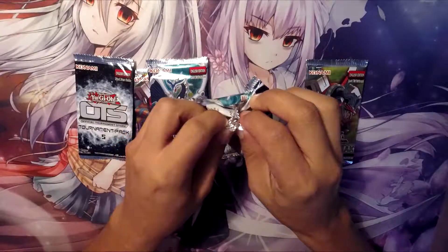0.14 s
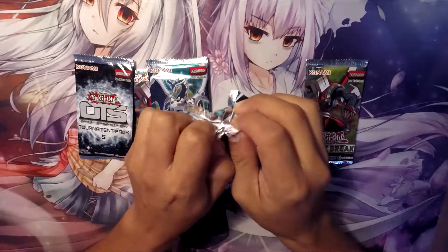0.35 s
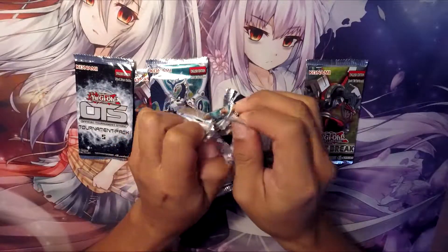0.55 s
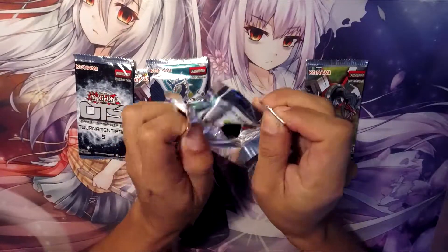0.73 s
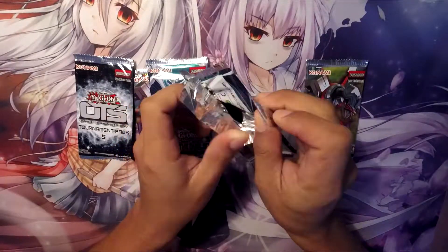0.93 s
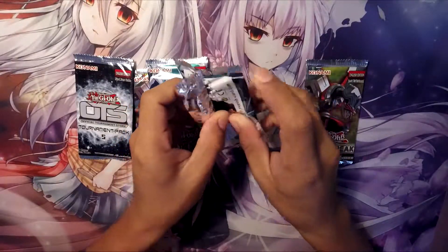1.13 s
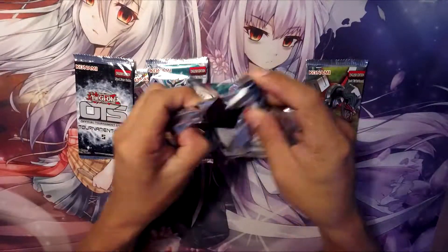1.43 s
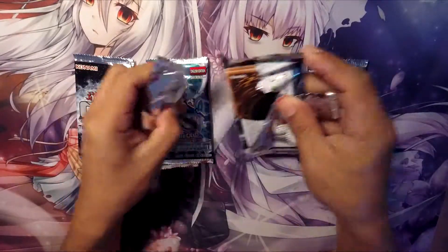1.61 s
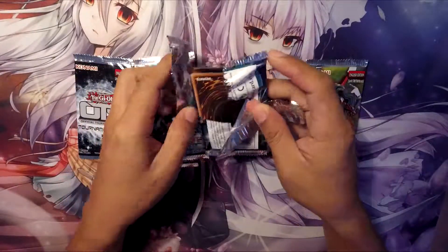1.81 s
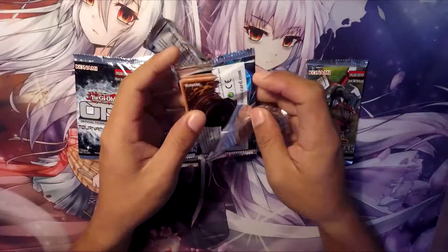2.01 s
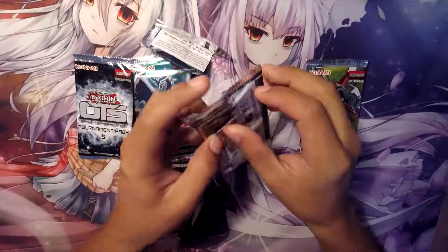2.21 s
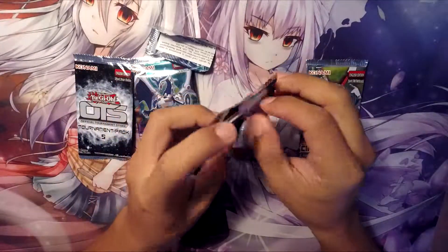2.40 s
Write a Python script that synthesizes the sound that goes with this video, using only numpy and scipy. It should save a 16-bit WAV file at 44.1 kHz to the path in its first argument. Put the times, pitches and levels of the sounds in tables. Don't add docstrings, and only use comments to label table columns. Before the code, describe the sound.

A thin foil packet is crinkled, pulled and ripped open by hand, close up

```python
import sys
import numpy as np
from scipy import signal
from scipy.fft import rfft, irfft
from scipy.io import wavfile
from scipy.ndimage import map_coordinates

SR = 44100
rng = np.random.default_rng(int(sys.argv[2]) if len(sys.argv) > 2 else 0)


def inscribe(sig):
    pcm = np.round(np.clip(np.atleast_2d(sig).T, -1, 1) * 32767)
    wavfile.write(sys.argv[1], SR, pcm.astype(np.int16))


def volts(x):
    e = np.asarray(x, float) / 20
    return 10 ** e


N = 112454


def unit(x):
    return x / np.sqrt(np.mean(x ** 2) + 1e-20)


def along(points, hz):
    f, v = np.transpose(points)
    return np.interp(np.log(hz + 1), np.log(f + 1), v)


def coloured(x, points, size=8192):
    level_db = along(points, np.fft.rfftfreq(size, 1 / SR)).clip(-120)
    cepstrum = irfft(level_db * np.log(10) / 20, size)
    cepstrum[1:size // 2] *= 2
    cepstrum[size // 2 + 1:] = 0
    ring = irfft(np.exp(rfft(cepstrum)), size)[:min(size // 2, x.shape[-1])]
    ring = ring.reshape([1] * (x.ndim - 1) + [-1])
    return signal.fftconvolve(x, ring, axes=-1)[..., :x.shape[-1]]


def noise():
    return rng.standard_normal(N)


def wobble(knots_per_s):
    return map_coordinates(rng.standard_normal(1000), [np.arange(N) * knots_per_s / SR])


def placed(start_s, shapes):
    first = np.round(start_s * SR).astype(int).clip(0)
    at = first[:, None] + np.arange(shapes.shape[1])
    return np.bincount(at.ravel(), shapes.ravel(), N + SR)[:N]


def rings(hz, cycles, size):
    turns = np.arange(size) / SR * hz.clip(600, SR / 2.4)[:, None]
    return np.sin(2 * np.pi * turns) * volts(-turns * 60 / cycles) * (1 - np.exp(-1.5 * turns))


# start in seconds, hold in seconds, rustle in dB, rumble in dB.
STROKES = [(0, 0.0056, -40.5, -47), (0.135, 0.11, -51, -55), (0.218, 0.15, -45.5, -58.5),
           (0.39, 0.07, -46, -62), (0.493, 0.059, -36.5, -57), (0.561, 0.057, -30.5, -40.5),
           (0.654, 0.054, -45.5, -73), (0.728, 0.025, -34, -54.5), (0.83, 0.037, -40, -49.5),
           (0.896, 0.026, -54, -43.5), (0.969, 0.11, -39, -52), (1.022, 0.03, -31.5, -46.5),
           (1.085, 0.16, -47.5, -59), (1.394, 0.019, -21.5, -36), (1.427, 0.041, -31, -41),
           (1.481, 0.22, -48.5, -57.5), (1.905, 0.023, -66, -53), (1.972, 0.098, -48, -54),
           (2.215, 0.061, -48, -62), (2.446, 0.063, -59, -82)]


def strokes(column, attack_s, t60_s):
    rows = np.array(STROKES)
    since_s = np.arange(N) / SR - rows[:, :1]
    rise = np.clip(since_s / attack_s + 0.5, 0, 1)
    release_s = np.clip(since_s - rows[:, 1:2], 0, None)
    level = volts(rows[:, column, None]) * rise * volts(-60 * release_s / t60_s)
    return np.sqrt((level ** 2).sum(axis=0))


# frequency in Hz, level in dB per Hz.
FOIL = [(180, -39.5), (300, -7.5), (2060, -13.5), (3570, -9), (5520, -7.5), (7970, -10.5), (10600, -8),
        (13600, -32.5), (16400, -38)]


def rustle(count=4500, size=300):
    when, luck = rng.random((count, 2)).T
    hz = 3530 * np.exp(0.63 * rng.standard_normal(count))
    clumps_db = 3 * wobble(40.16) + 3 * wobble(150)
    size_db = -3.5 * np.log(1 - luck) + clumps_db[(when * N).astype(int)]
    size_gain = volts(np.minimum(size_db, 12))[:, None]
    start_s = when * N / SR
    ticks = placed(start_s, size_gain * rings(hz, 9.4, size))
    clicks = placed(start_s, size_gain * rng.standard_normal((count, 24)))
    sheen = volts(-16 + clumps_db) * noise()
    swarm = unit(ticks) + 0.32 * unit(clicks) + sheen
    force = strokes(2, attack_s=0.0021, t60_s=0.053)
    idle = volts(-55.5 - 3)
    return np.hypot(force, idle) * unit(coloured(swarm, FOIL))


# frequency in Hz, level in dB per Hz.
TABLE = [(150, 3), (220, 6), (330, -13), (1500, -29.5)]


def rumble():
    lumps = volts(0.88 * wobble(27.5))
    return strokes(3, attack_s=0.016, t60_s=0.15) * unit(lumps * coloured(noise(), TABLE))


# frequency in Hz, level in dB per Hz.
HUSH = [(30, 8), (160, 0), (300, -4.5), (3500, -19.5), (6000, -14.5), (15000, -32)]


def hush():
    return volts(-54.5 + 3.5 * wobble(8.8)) * unit(coloured(noise(), HUSH))


# start in seconds, crack in dB, pop in dB, pop pitch in Hz.
PINCHING = [
    (0.0082, -21.5, -24.5, 900),
    (0.0605, -34.5, -25.5, 2430),
    (0.1358, -29.5, -32, 2920),
    (0.1638, -27, -19.5, 1090),
    (0.2268, -8, -20, 1990),
    (0.2318, -10, -12.5, 2020),
    (0.3087, -18.5, -20, 2200),
    (0.4014, -17, -24.5, 2360),
    (0.4593, -15.5, -12.5, 1910),
]
PULLING = [(0.505, -14, -20, 3060), (0.5101, -13, -17, 1980), (0.5192, -12, -16, 2860),
           (0.5338, -16, -19, 1250), (0.5477, -15, -14, 2170), (0.5565, -12, -14, 1490),
           (0.5634, -10, -10, 2280), (0.5733, -14, -20, 3340), (0.5925, -16, -15, 2860),
           (0.6027, -23, -14, 2090), (0.6085, -11, -15, 1460), (0.614, -17, -14, 1010),
           (0.6247, -18, -17, 1980), (0.6321, -21, -18, 900), (0.717, -24, -29, 3100),
           (0.7344, -15, -21, 2260), (0.7522, -19, -25, 1510), (0.7717, -17, -20, 2890),
           (0.8373, -30, -26, 2170), (0.8557, -25, -27, 1080)]
GRIPPING = [(0.9044, -30, -33, 3300), (0.9293, -20.5, -21, 1090), (0.9566, -19.5, -23, 3040),
            (0.98, -28, -28, 1690), (0.9871, -19.5, -32, 1220), (1.0058, -19.5, -24.5, 1620),
            (1.0243, -16, -34, 2160), (1.0336, -16, -27, 2840), (1.1631, -50, -26, 2030),
            (1.1746, -14, -15.5, 2900), (1.196, -20, -17, 3170), (1.2267, -31, -22.5, 3000),
            (1.2606, -39, -20.5, 1310), (1.2787, -20, -17, 2160), (1.288, -17.5, -17, 1470),
            (1.313, -19, -15.5, 915), (1.3442, -31, -27, 1530)]
RIPPING = [
    (1.3876, -15.5, -16, 3130),
    (1.3963, -13, -12.5, 2800),
    (1.4024, -8.5, -9.5, 1530),
    (1.413, -5, -13, 3080),
    (1.4221, -12, -11, 2020),
    (1.4398, -13, -4.5, 2090),
    (1.6296, -20.5, -22.5, 2780),
    (1.6556, -19, -24, 800),
]
TURNING = [
    (1.8075, -28, -27.5, 2840),
    (1.916, -17, -25, 1440),
    (1.9775, -29.5, -30, 3440),
    (1.999, -22.5, -31.5, 1410),
    (2.2571, -25.5, -29.5, 880),
    (2.2695, -26.5, -26, 2800),
    (2.4586, -26.5, -30, 2740),
]
# start in seconds,
# crack in dB, pop in dB, pop pitch in Hz.
FURTHER_SNAPS = [(0.1645, -15.5, -28, 1520), (0.2239, -20, -18, 1970), (0.2967, -20, -29, 2510),
                 (0.3165, -21, -24, 2030), (0.556, -7, -11, 1120), (0.597, -22, -11.5, 1870),
                 (0.6398, -22, -32, 1010), (0.736, -19, -25, 1450), (0.784, -30, -29, 1990),
                 (0.8335, -30, -25, 1000), (0.8452, -33, -20, 2640), (0.867, -51, -41, 2500),
                 (0.882, -39, -33.5, 1190), (1.383, -35, -34, 1500), (1.409, -14, -14, 2430),
                 (1.447, -21, -22, 1980), (1.452, -16, -30, 2480), (1.454, -22, -25, 1780),
                 (1.925, -54, -37, 1370), (1.9395, -51, -32.5, 800), (1.976, -44, -39, 700),
                 (1.993, -35, -30.5, 990), (2.0045, -30, -41, 1500), (2.0545, -30, -31, 3000),
                 (2.228, -33, -34, 990), (2.2415, -35, -45, 1500), (2.2472, -35, -46, 2000),
                 (2.28, -33, -48, 1520), (2.285, -34, -35, 810), (2.479, -51, -33, 670)]
# start in seconds, crack in dB.
THIN = [(0.0046, -24.5), (0.174, -28.5), (0.208, -22), (0.266, -24), (0.2722, -23.5), (0.3322, -7.5),
        (0.3718, -27), (0.3782, -25.5), (0.4232, -25), (0.4495, -33), (0.4543, -19), (0.492, -36),
        (0.5021, -12), (0.583, -23), (0.7245, -39), (0.8114, -21), (0.8486, -22.5),
        (0.9504, -25), (0.997, -23), (0.9995, -15), (1.045, -13.5), (1.0487, -10.5), (1.0558, -23),
               (1.0564, -15.5), (1.084, -23.5), (1.1006, -26), (1.1195, -13), (1.123, -9), (1.1405, -34),
               (1.1457, -34), (1.1754, -39), (1.209, -31), (1.2184, -9), (1.2496, -15), (1.2553, -11),
               (1.331, -22), (1.465, -18.5),
        (1.527, -30), (1.5588, -28), (1.5698, -31), (1.6042, -20), (1.675, -27), (1.6946, -20),
             (1.726, -33), (1.7438, -31.5), (1.8356, -27.5), (1.8637, -31), (1.8809, -28), (2.0147, -27),
             (2.0214, -21), (2.039, -21), (2.0514, -20), (2.0886, -26.5), (2.1752, -35), (2.3846, -30),
             (2.3945, -27), (2.4756, -23), (2.5209, -15), (2.542, -23.5)]


def creases():
    thin = np.array(THIN)
    thin = [(s, db, db - 9.0, 2400) for s, db in thin]
    return np.concatenate([PINCHING, PULLING, GRIPPING, RIPPING, TURNING, FURTHER_SNAPS, thin]).T


def with_ticks(s, crack_db, pop_db, hz, count=5):
    shape = (len(s), count)
    late_s = rng.standard_exponential(shape) * 0.006 + 0.001224
    late_s[:, 0] *= -0.32
    weak_db = (-21.5 + 8 * rng.standard_normal(shape)).clip(None, -12)
    bend = np.exp(0.32 * rng.standard_normal(shape))
    s = np.append(s, s[:, None] + late_s)
    crack_db = np.append(crack_db, crack_db[:, None] + weak_db)
    pop_db = np.append(pop_db, pop_db[:, None] + weak_db)
    return s, crack_db, pop_db, np.append(hz, hz[:, None] * bend).clip(650)


# frequency in Hz, level in dB.
BRIGHT = [(2400, -20.5), (5500, 2.5), (7500, -13), (11000, -20.5), (16000, -85)]


def cracks(white, luck, rise, fall):
    burst = unit(coloured(white, BRIGHT)) * fall
    hz = 5300 * np.exp(0.18 * np.tanh(luck))
    return burst + 0.22 * rise * rings(hz, 14, white.shape[1])


def pops(white, hz, fall, rise_s):
    dull = unit(coloured(white, [(400, -42), (800, -4), (2500, 4.5), (4500, -25.5)]))
    cycles = np.minimum(0.007 * hz[:, None], 9)
    ring = np.roll(rings(hz, cycles, white.shape[1]), round(rise_s * SR), axis=1)
    return ring + volts(-1) * dull * fall


def peaked(x):
    return x / np.abs(x).max(axis=1, keepdims=True)


def snaps(size=700):
    s, crack_db, pop_db, hz = with_ticks(*creases())
    rise_s, t = 0.0006, np.arange(size) / SR
    white = rng.standard_normal((2, len(s), size))
    luck = rng.standard_normal((len(s), 2))
    t60_s = 0.0065 * np.exp(0.3 * luck[:, :1])
    rise = 1 - np.exp(-t / rise_s)
    fall = rise ** 2 * volts(-60 * t / t60_s)
    crack = volts(crack_db)[:, None] * peaked(cracks(white[0], luck[:, 1], rise, fall))
    pop = volts(pop_db)[:, None] * peaked(pops(white[1], hz, fall, rise_s))
    return placed(s - rise_s, crack + pop)


# start in seconds, level in dB, pitch in Hz.
SPARKS = [(0.056, -36, 10200), (0.2058, -13.5, 10350), (0.2776, -15.5, 9550), (0.49, -23, 9150),
          (0.805, -23, 6600), (1.397, -14, 10000), (1.97, -32, 5000), (2.169, -33, 5570),
          (0.5105, -10, 4850), (0.519, -15, 10500), (0.5634, -6.5, 3200), (0.642, -25, 10600),
          (0.814, -25, 5900), (0.904, -29, 3430), (1.2187, -14, 4800), (1.3125, -17.5, 3230),
          (1.603, -20, 8350), (1.694, -16, 8750), (1.838, -25, 5350), (1.882, -24.5, 3870),
          (1.9781, -26, 3150), (2.037, -10, 5300), (2.175, -26, 6140), (2.542, -16, 5200)]


def sparks(count=10, size=300):
    s, db, hz = np.transpose(SPARKS)
    rough = 1 + 0.23 * np.resize(rng.standard_normal((count, size)), (len(s), size))
    return placed(s, volts(db)[:, None] * rough * rings(hz, 30, size))


# middle in seconds, half length in seconds, level in dB.
RUBS = [
    (0.81, 0.063, -55.5),
    (1.525, 0.073, -52.5),
    (2.01, 0.12, -54),
    (2.394, .04, -54),
]
# frequency in Hz, level in dB per Hz.
SKIN = [(250, -12), (800, 4), (2200, -27)]


def rubbing():
    middle_s, half_s, db = np.array(RUBS).T[..., None]
    away = (np.arange(N) / SR - middle_s) / half_s
    swell = (volts(db) * np.exp(-away ** 4)).sum(axis=0)
    return swell * unit(volts(7.3 * wobble(70)) * coloured(noise(), SKIN))


ROOM_T60 = [(500, 0.27), (10000, 0.041)]


def room(x, count=8):
    wet = np.zeros(N + SR)
    for part in np.array_split(np.arange(N), count):
        hz, t, z = signal.stft(rng.standard_normal(SR // 2), SR, nperseg=256)
        decay = volts(-60 * t / along(ROOM_T60, hz)[:, None])
        tail = signal.istft(z * decay, SR, nperseg=256)[1]
        heard = signal.fftconvolve(x[part], tail / np.linalg.norm(tail))
        wet[part[0] + 130:][:len(heard)] += heard
    return wet[:N]


def scene():
    foil = rustle() + sparks() + snaps()
    return (foil + volts(-15) * room(foil) + rumble() + hush() + rubbing())[None]


# frequency in Hz, level in dB.
MIC = [(106, -27), (122, -15), (150, 2), (15100, -3), (15400, -34), (16600, -31)]


def microphone(x):
    return coloured(x, MIC)


def top_cut(x):
    return signal.sosfilt(signal.butter(12, 16520, fs=SR, output="sos"), x)


def record(dry):
    heard = microphone(dry)
    return top_cut(heard)


dry = scene()
out = record(dry)
inscribe(out)
```